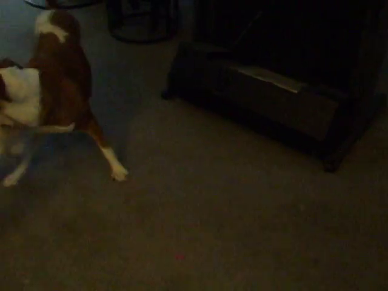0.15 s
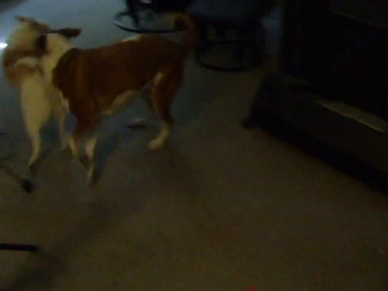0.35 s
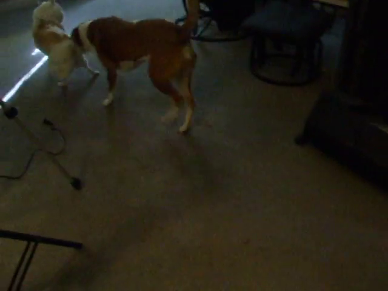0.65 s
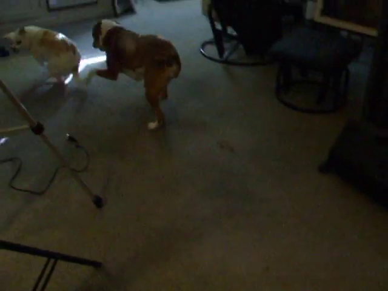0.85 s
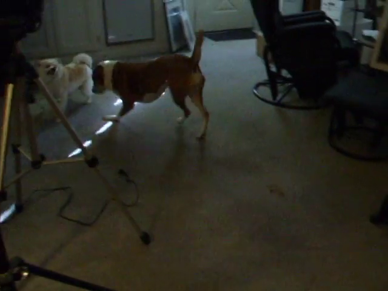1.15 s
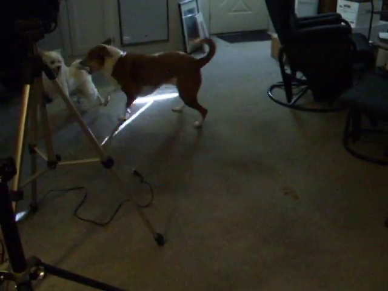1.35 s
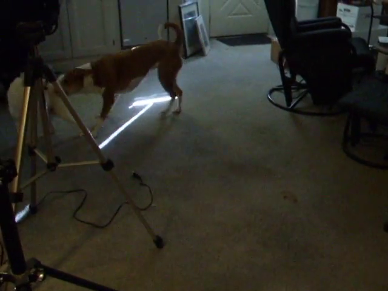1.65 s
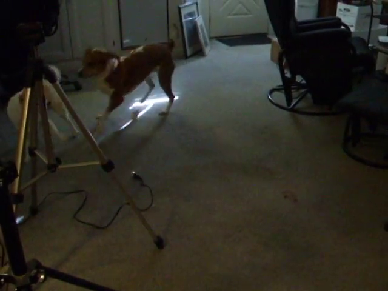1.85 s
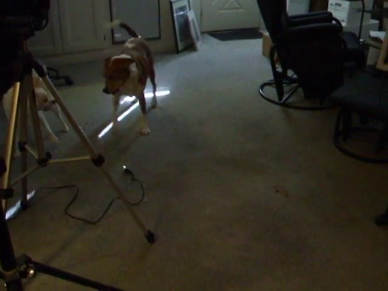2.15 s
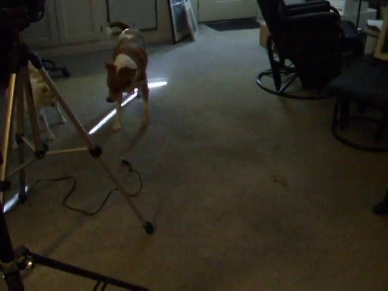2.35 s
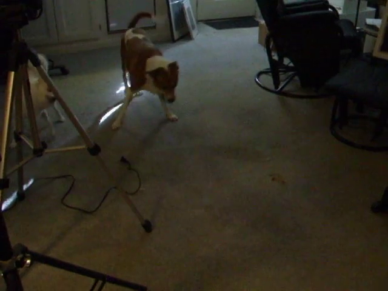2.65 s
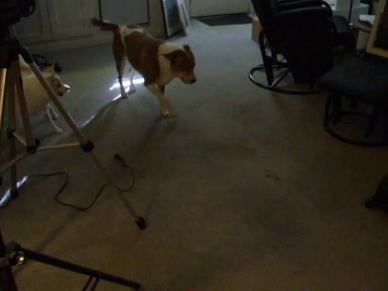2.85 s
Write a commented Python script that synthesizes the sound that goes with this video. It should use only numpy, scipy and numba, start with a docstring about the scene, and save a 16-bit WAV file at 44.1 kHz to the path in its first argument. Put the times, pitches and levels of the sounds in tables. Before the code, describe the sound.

Two dogs play-wrestling on carpet, breathy snorts and huffs, paw thuds and a sharp teeth clack

```python
"""Two dogs wrestle on a carpet a few metres from a small camera: breathy huffs and snorts are noise chopped
by a fluttering throat and shaped by gliding mouth resonances, with pinched squeaks and a nasal whistle as tones.
Paws thud and scuff by ringing the modes of the floor; teeth clack as a noise tick plus one decaying ring.
A furnished room answers briefly with a noise tail; the camera adds hiss, wavering drones and a thin whine."""
import sys
import numpy as np
from scipy import signal
from scipy.fft import rfft, irfft
from scipy.io import wavfile
from scipy.ndimage import uniform_filter1d
from numba import njit

SR = 44100
rng = np.random.default_rng(int(sys.argv[2]) if len(sys.argv) > 2 else 0)


def dump(signal):
    """Clip the signal to [-1, 1] and save it as 16-bit WAV at the path in sys.argv[1]."""
    limited = np.clip(np.atleast_2d(signal).T, -1, 1)
    pcm = np.round(limited * 32767).astype(np.int16)
    wavfile.write(sys.argv[1], SR, pcm)


def natural_amplitude(level_db):
    """Convert a level in decibels to a linear amplitude factor, elementwise."""
    exponent = np.asarray(level_db, float) / 20
    return 10 ** exponent


N = 132300
T = np.arange(N) / SR

# Spectral shape of the steady hiss: pitch_hz, relative level_db
AIR_SPECTRUM = [(25, -8), (60, -1), (110, -5), (200, -2.5), (330, -2), (600, -3), (1200, -5.5), (2500, -6),
                (4500, -8.5), (7600, -7.5), (8300, -10), (9000, -16.5)]
# Faint household tones: pitch_hz, width_hz, level_db (rms)
DRONES = [(56.5, 1.4, -64), (292.6, 12, -72.5), (532.6, 11, -77.5)]
# Comb of thin high tones: pitch_hz of each
WHINE_HZ = [7822, 7852, 7882, 7912, 8088, 8118, 8148, 8178]
# The same tones: level_db (rms) of each
WHINE_DB = [-71, -63, -64, -73, -76, -66, -67, -76]
# Ringing modes of the padded floor: pitch_hz, relative level_db, t60_s
FLOOR_MODES = [(64, -1, 0.29), (120, -3, 0.23), (200.7, -7, 0.079), (300.6, -1, 0.054), (343, -7.5, 0.046),
               (417, -11, 0.057), (511, -13.5, 0.043), (770, -13.5, 0.046)]
# Shuffling of paws over time: time_s, level_db (rms)
SCUFF_LEVELS = [(0.0, -52.5), (0.52, -60), (0.83, -45.5), (0.97, -45), (1.14, -58), (1.3, -80), (1.4, -62),
                (1.59, -53), (1.74, -49), (1.92, -59.5), (2.43, -67), (3.0, -69)]
# Breath effort, one list per huff: time_s, effort_db
HUFF_EFFORTS = [
    [(0.04, -56), (0.06, -50.5), (0.088, -68), (0.132, -45.5), (0.14, -42)],
    [(0.135, -40.5), (0.153, -50.5), (0.173, -55), (0.191, -53.5), (0.199, -40.5), (0.261, -39.5),
     (0.34, -75)],
    [(0.55, -48), (0.568, -42.5), (0.616, -39), (0.666, -80), (0.686, -57), (0.7, -51)],
    [(0.74, -62.5), (0.784, -50.5), (0.84, -54), (0.97, -29), (1.03, -35.5), (1.072, -71), (1.13, -55.5)],
    [(1.16, -45), (1.17, -63), (1.178, -46.5), (1.212, -57.5), (1.29, -67)],
    [(1.535, -63), (1.547, -45.5), (1.567, -48.5), (1.597, -48), (1.605, -42)],
    [(1.6, -40), (1.624, -27.5), (1.676, -32.5), (1.682, -31.5), (1.765, -49)],
    [(1.76, -43.5), (1.818, -46), (1.976, -66), (1.98, -63)],
    [(2.47, -73), (2.492, -74), (2.496, -60), (2.556, -60), (2.566, -60), (2.594, -54.5), (2.624, -62),
     (2.65, -46)],
    [(2.645, -48), (2.657, -47), (2.679, -24), (2.711, -22), (2.783, -52.5), (2.8, -61)],
]
# Throat, one row per huff: flutter_hz, flutter_depth (0-1)
THROATS = [(60, .4), (65, .5), (70, .3), (58, .65), (75, .6), (70, .4), (80, .4), (70, .5), (60, .3),
           (65, .45)]
# Breath balance, one row per huff: open_hiss_db at the peak, chest_db
BREATH_MIX = [(-7, -3.5), (-3.5, -8), (-6, -6), (-1.5, -7.5), (-3, 1), (-4, -4.5), (-7, -14), (2.5, -9),
              (-16, -17.5), (-5, -16.5)]
# Mouth and nose resonances, one list per huff: pitch_hz at mid-huff, width_hz, level_db, glide_hz_per_s
MOUTHS = [
    [(870, 180, 10.5, -1000), (1840, 250, 6, 4004)],
    [(860, 250, -5, 3), (1416, 410, 0.5, -3000), (2180, 600, -2, 797), (3130, 600, -0.5, 3),
     (4250, 600, -0.5, -2), (5840, 1500, 0, -1)],
    [(1156, 240, -0.5, -2000), (1810, 240, 1, 992), (2340, 710, -3.5, 0), (2954, 230, 1.5, 3),
     (3640, 440, -1.5, 7), (5300, 600, -14.5, 3)],
    [(578, 180, -2.5, 704), (1218, 230, -2.5, 494), (1756, 260, 1, -300), (2770, 660, 0.5, -2),
     (4540, 670, -2.5, -11), (5830, 1500, -4, -1), (7400, 1100, -4.5, -6)],
    [(787, 210, 10.5, -500), (1250, 150, 4, 2), (2250, 320, 5.5, -4), (2850, 470, -5, -1)],
    [(1480, 270, 0, -1500), (2130, 310, -9, -8), (3000, 300, -10, -1.5), (4860, 570, -4, -2)],
    [(1240, 150, -15, 996.5), (1560, 190, -2, 200.5), (2040, 360, -5.5, -5), (2380, 140, -7, 4),
     (3005, 580, 0, 0), (5450, 1300, -5.5, 0.5), (6080, 1100, -8.5, -7.5)],
    [(740, 210, 2, -900), (1780, 470, -11, 0.5), (3400, 450, -3.5, -4), (5000, 810, -6.5, 0.5),
     (6400, 800, -4, 3)],
    [(1080, 81, 0.5, -300), (1450, 120, -17, -2), (1870, 320, 2, 5)],
    [(1080, 97, -6, 0), (1362, 220, 0.5, 303), (1940, 460, -7.5, 1000.5), (2830, 680, -5.5, 3),
     (3570, 670, -10.5, 0), (4230, 220, -17.5, 3), (5450, 700, -6.5, 2), (6680, 1100, -6.5, 0)],
]
# Spectral shape of the open breath hiss: pitch_hz, relative level_db
HISS_SPECTRUM = [(100, -25), (400, 0.5), (1500, -3.5), (3800, -5.5), (5500, -4), (7800, -3.5), (9000, -15)]
# Brief pinched tones in the breath: start_s, length_s, pitch_hz, peak_db
SQUEAKS = [(.095, 0.046, 876, -47), (.135, 0.011, 747, -40), (.19, 0.023, 1560, -37.5),
           (.255, 0.021, 870, -39), (.556, 0.043, 1634, -32.5), (.158, 0.023, 1488, -43.5),
           (1.555, .03, 1494, -49.5), (1.69, 0.032, 1488, -30), (2.655, .03, 3520, -40)]
# Teeth meeting: start_s, level_db, ring_hz
CLACKS = [(0.15, -28.5, 2166), (1.178, -45.5, 1185), (1.544, -57, 1500), (1.681, -17, 1515),
          (2.225, -51.5, 1920)]
# Paws landing: start_s, level_db, boom_db (level change of the lowest floor modes, negative thins the boom)
LANDINGS = [(0.154, -31.5, -33), (0.208, -42, -28), (0.294, -38, -11), (0.482, -25.5, -46),
            (0.518, -32.5, -34), (0.585, -48, -20), (0.756, -27, -29), (0.999, -51, -23), (1.097, -37, -30),
            (1.3, -29, -20.5), (1.566, -34, -26), (1.613, -37, -5), (1.677, -35, -5.5), (1.826, -33, -29),
            (2.038, -50, -12), (2.698, -30.5, -7.5)]
# Thin nasal whistle before the last snort: time_s, pitch_hz, level_db, octave_db
WHISTLE = [(2.5, 1022, -73, -75), (2.54, 1113, -58, -56), (2.566, 1111, -58, -86),
           (2.602, 1064, -57, -51.5), (2.65, 1080, -53, -67), (2.66, 1040, -58, -70)]


def level(x, db):
    """Scale to an rms level."""
    return x * natural_amplitude(db) / np.sqrt(np.mean(x ** 2))


def add(out, x, start_s):
    """Mix x in from a start time."""
    i = int(start_s * SR)
    out[i:i + len(x)] += x[:len(out) - i]


def coloured(points, n):
    """Noise whose spectrum follows (Hz, dB) points joined on a log frequency axis."""
    hz, db = np.array(points).T
    bins_hz = np.arange(n // 2 + 1) * SR / n + 1
    gain = natural_amplitude(np.interp(np.log(bins_hz), np.log(hz), db))
    return irfft(rfft(rng.standard_normal(n)) * gain, n)


def band(x, hz, width_hz):
    """Two-pole resonance, gain 1 at the centre."""
    return signal.lfilter(*signal.iirpeak(hz, hz / width_hz, SR), x)


def slow_noise(n, size):
    """Noise smoothed over size samples, at unit rms, for unsteady pitch."""
    return level(uniform_filter1d(rng.standard_normal(n), size=size), 0)


def ring(hz, t60_s, n):
    """One struck mode: a sine that falls 60 dB in t60_s."""
    t = np.arange(n) / SR
    return np.sin(2 * np.pi * hz * t) * np.exp(-np.log(1000) * t / t60_s)


@njit
def sweep(x, hz, width_hz):
    """State-variable resonance whose centre moves, gain 1 at the centre."""
    y, band_state, low_state = np.empty(len(x)), 0., 0.
    for i in range(len(x)):
        g, k = np.tan(np.pi * hz[i] / SR), width_hz / hz[i]
        v = (band_state + g * (x[i] - low_state)) / (1 + g * (g + k))
        band_state, low_state, y[i] = 2 * v - band_state, low_state + 2 * g * v, k * v
    return y


def camera():
    """Hiss of room and electronics, drones of narrow noise that waver, a comb of thin high sines."""
    hiss = level(coloured(AIR_SPECTRUM, N), -51)
    drones = sum(level(band(rng.standard_normal(N), hz, width_hz), db) for hz, width_hz, db in DRONES)
    whine = np.zeros(N)
    for hz, db in zip(WHINE_HZ, WHINE_DB):
        whine += natural_amplitude(db) * np.sqrt(2) * np.sin(2 * np.pi * (hz * T + rng.random()))
    return hiss + drones + whine


def floor_thud(boom_db, chance):
    """Floor modes rung through soft padding; chance varies each mode's level and tuning."""
    n, pad_s, boom_top_hz = 12000, .003, 150
    thud = np.zeros(n)
    for k, (hz, db, t60_s) in enumerate(FLOOR_MODES):
        mode_db = db + 2 * chance[0, k] + boom_db * (hz < boom_top_hz)
        thud += (-1) ** k * natural_amplitude(mode_db) * ring(hz * (1 + 0.0072 * chance[1, k]), t60_s, n)
    return thud * (1 - np.exp(-T[:n] / pad_s))  # padding softens the onset


def scuffs():
    """Many light random taps ring the floor as the paws shuffle."""
    taps_per_s, spread_db = 500, 2
    hits = rng.random(N) < taps_per_s / SR
    taps = hits * natural_amplitude(spread_db * rng.exponential(size=N)) * rng.standard_normal(N)
    thud = floor_thud(-17, np.zeros((2, len(FLOOR_MODES))))
    shuffle = level(signal.fftconvolve(taps, thud)[:N], 0)
    return shuffle * natural_amplitude(np.interp(T, *np.array(SCUFF_LEVELS).T))


def flutter(hz, depth, n):
    """Loose folds let the air through in puffs of uneven spacing and strength."""
    jitter, scatter_db, puff_decay = .18, 2, .35  # decay in fractions of a puff
    chance = rng.standard_normal((80, 2))
    period = SR / hz
    starts = np.cumsum(np.exp(jitter * chance[:, 0])) * period - period * 2
    phase = np.interp(np.arange(n), starts, np.arange(len(starts)))
    puffs = np.exp(-(phase % 1) / puff_decay) * natural_amplitude(scatter_db * chance[phase.astype(int), 1])
    puffs = level(uniform_filter1d(puffs, size=130), 0)
    depth = np.clip(depth, 0, 1)
    return 1 - depth + depth * puffs


def formant(x, hz, width_hz):
    """Two moving resonances in a row give steep skirts; gain offsets the width."""
    return sweep(sweep(x, hz, 1. * width_hz), hz, 2. * width_hz) / np.sqrt(width_hz)


def vocal_tract(x, mouth, lean_s):
    """Gliding mouth and nose resonances in parallel, with alternating polarity."""
    return sum((-1) ** k * natural_amplitude(db) * formant(x, hz + glide * lean_s, width_hz)
               for k, (hz, width_hz, db, glide) in enumerate(mouth))


def chest(x):
    """One broad fixed low resonance."""
    return formant(x, np.full(len(x), 260.), 260)


def huffs():
    """Turbulent breath, chopped by the throat, through each slowly changing mouth shape and the chest."""
    out, n = np.zeros(N), SR // 2
    for rows, (flutter_hz, depth), (hiss_db, chest_db), mouth in zip(HUFF_EFFORTS, THROATS, BREATH_MIX, MOUTHS):
        times_s, efforts_db = np.array(rows).T
        start_s, end_s = times_s[0], times_s[-1]
        t = np.arange(n) / SR + start_s
        fade = np.clip(np.minimum(t - start_s, end_s - t) / 0.011, 0, 1)
        effort = natural_amplitude(np.interp(t, times_s, efforts_db)) * fade
        gate = flutter(flutter_hz, depth, n)
        air = rng.standard_normal(n) * gate
        lean_s = np.minimum(t, end_s) - (start_s + end_s) / 2  # time from mid-huff, held after the end
        # Dividing by the steady response keeps the effort in charge of level
        voiced = vocal_tract(air * effort, mouth, lean_s) / np.std(vocal_tract(air, mouth, lean_s))
        body = natural_amplitude(chest_db) * chest(air * effort) / np.std(chest(air))
        brightness = (effort / effort.max()) ** 0.23  # harder breath is brighter
        hiss = level(coloured(HISS_SPECTRUM, n), hiss_db) * np.sqrt(gate) * effort * brightness
        add(out, voiced + body + hiss, start_s)
    return out


def squeaks():
    """Pinched breath tones with a wandering phase; each swells fast and dies more slowly."""
    out, wander_rad = np.zeros(N), .5
    for start_s, length_s, hz, db in SQUEAKS:
        t = T[:int(length_s * SR)]
        drift = slow_noise(4000, 150)[:len(t)]
        swell = np.sin(np.pi * np.sqrt(t / length_s)) ** 2
        add(out, natural_amplitude(db) * swell * np.sin(2 * np.pi * hz * t + wander_rad * drift), start_s)
    return out


def teeth():
    """Short hard clacks: a tick of noise and one ring."""
    out, n = np.zeros(N), 6000
    for start_s, db, hz in CLACKS:
        tick = .5 * rng.standard_normal(n) * np.exp(-T[:n] / .001)
        add(out, natural_amplitude(db) * (ring(hz, .035, n) + tick), start_s)
    return out


def landings():
    """Paws push the padded floor; some landings keep more of the low floor boom."""
    out = np.zeros(N)
    for start_s, db, boom_db in LANDINGS:
        chance = rng.standard_normal((2, len(FLOOR_MODES)))
        add(out, natural_amplitude(db) * floor_thud(boom_db, chance), start_s)
    return out


def whistle():
    """A slightly unsteady tone and its octave."""
    s, hz, db, octave_db = np.array(WHISTLE).T
    pitch_hz = np.interp(T, s, hz) * (1 + 0.023 * slow_noise(N, 400))
    phase = 2 * np.pi * np.cumsum(pitch_hz) / SR
    fade = np.clip(np.minimum(T - s[0], s[-1] - T) / .015, 0, 1)
    tone = natural_amplitude(np.interp(T, s, db)) * np.sin(phase)
    octave = natural_amplitude(np.interp(T, s, octave_db)) * np.sin(2 * phase)
    return fade * (tone + octave)


def room(x):
    """Diffuse decaying noise tail, fullest in the mids, after a short gap."""
    t60_s, tail_db, gap_s = 0.24, -4, 0.00577
    t = T[:SR // 2]
    tail = coloured([(50, -2.0), (1000, 3), (9000, -1.5)], len(t))
    tail *= np.exp(-np.log(1000) * t / t60_s) * (t > gap_s)
    tail *= natural_amplitude(tail_db) / np.sqrt(np.sum(tail ** 2))
    return x + signal.fftconvolve(x, tail)[:N]


def scene():
    """Dogs in the room over the camera's own noise."""
    dogs = scuffs() + huffs() + squeaks() + teeth() + landings() + whistle()
    return (room(dogs) + camera())[None]


def band_limit(x):
    """A steep low-pass at the top of the band."""
    return signal.sosfilt(signal.butter(12, 9290, fs=SR, output="sos"), x)


def record(dry):
    """The top rolls off steeply, the deepest bass is lost, and a small constant offset is added."""
    low_pass = signal.cheby1(8, 1, 8150, fs=SR, output="sos")
    high_pass = signal.butter(2, 45, "high", fs=SR, output="sos")
    mix = signal.sosfilt(high_pass, signal.sosfilt(low_pass, dry))
    return band_limit(mix - .0024)


dry = scene()
out = record(dry)
dump(out)
```